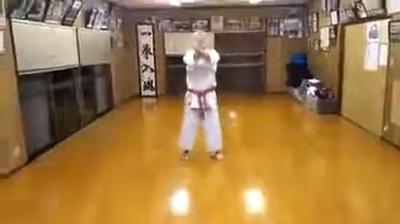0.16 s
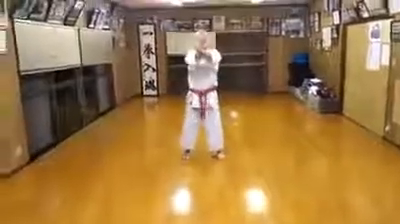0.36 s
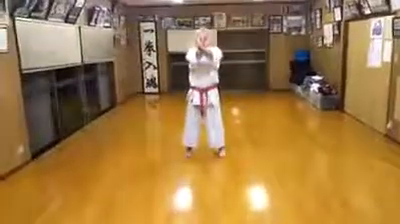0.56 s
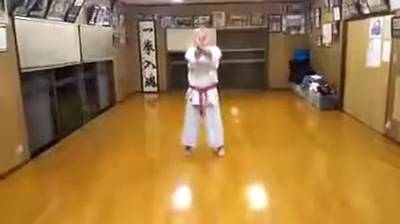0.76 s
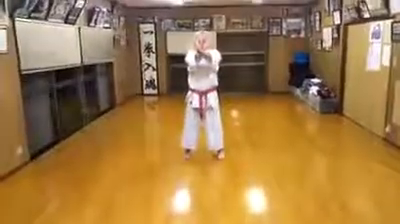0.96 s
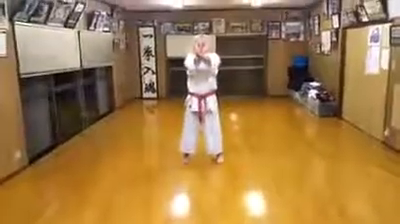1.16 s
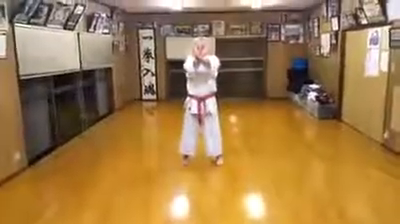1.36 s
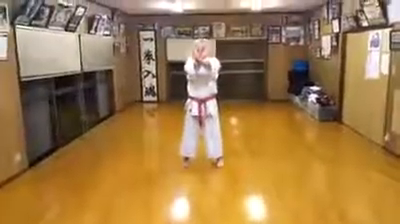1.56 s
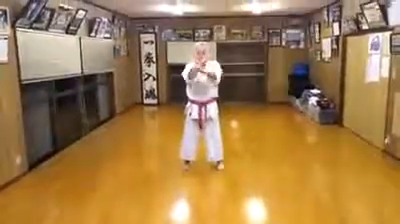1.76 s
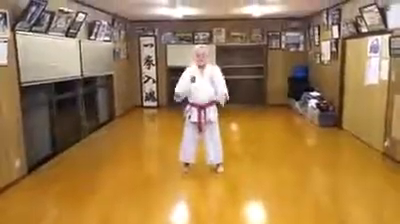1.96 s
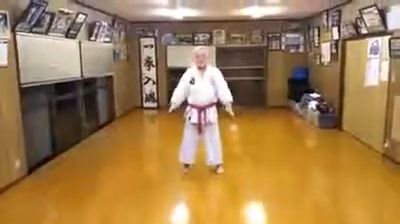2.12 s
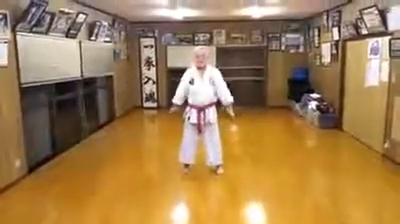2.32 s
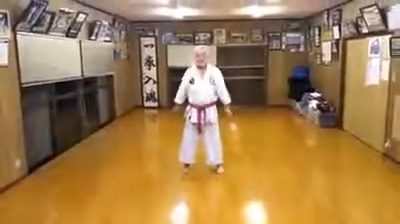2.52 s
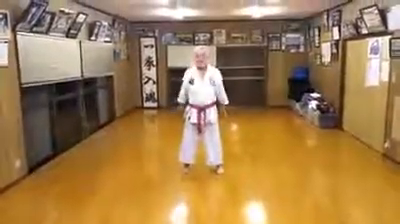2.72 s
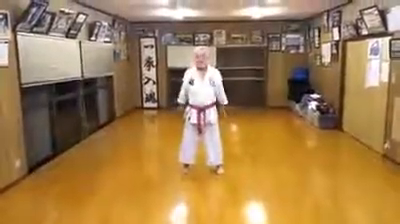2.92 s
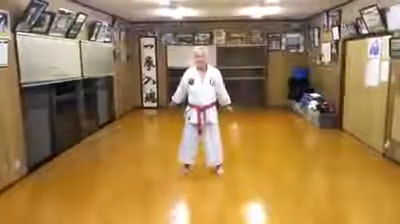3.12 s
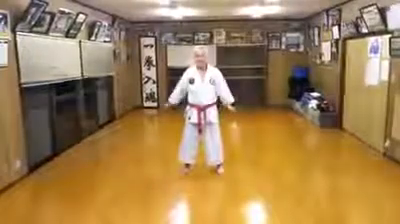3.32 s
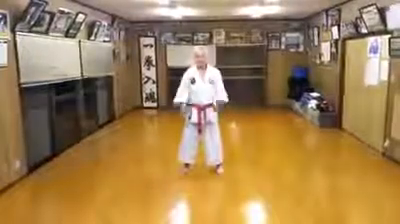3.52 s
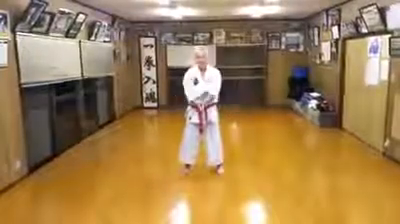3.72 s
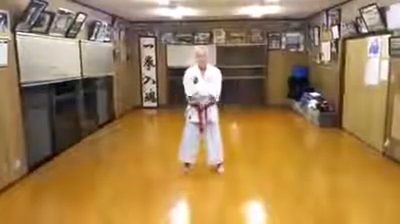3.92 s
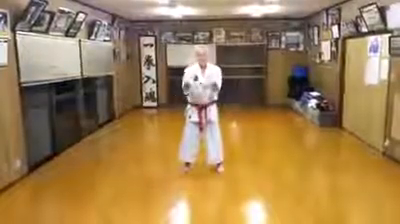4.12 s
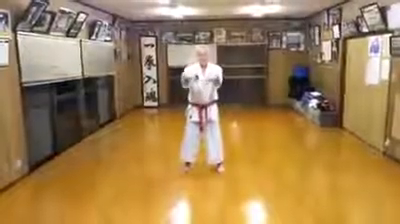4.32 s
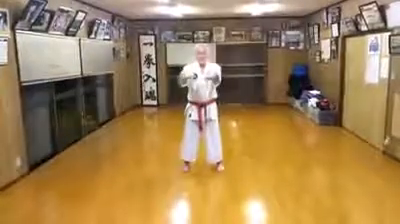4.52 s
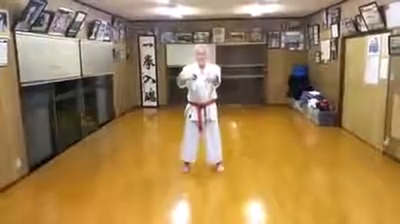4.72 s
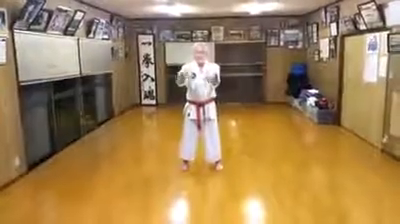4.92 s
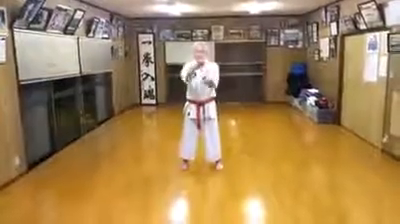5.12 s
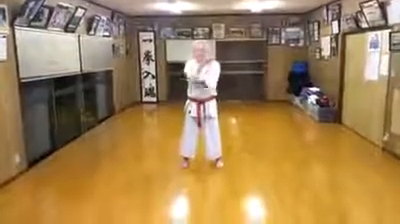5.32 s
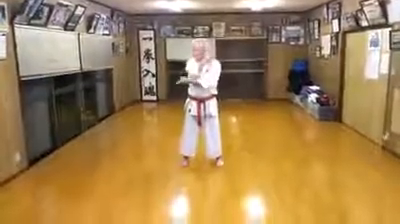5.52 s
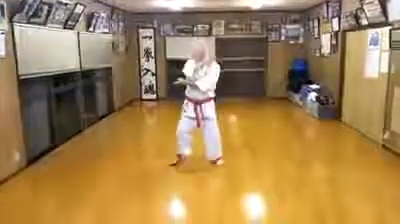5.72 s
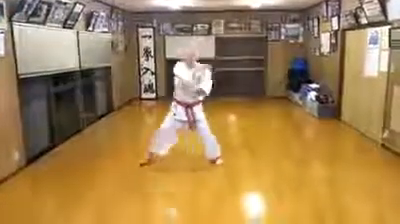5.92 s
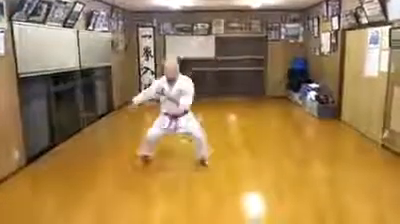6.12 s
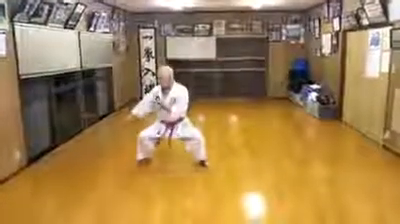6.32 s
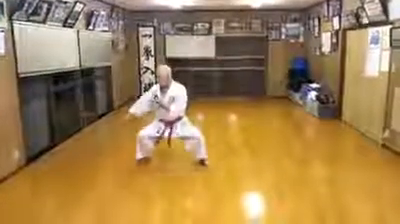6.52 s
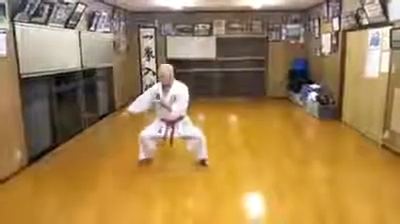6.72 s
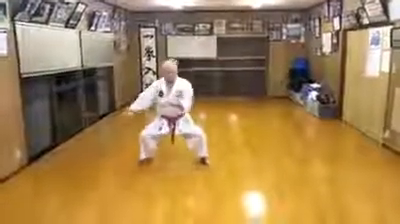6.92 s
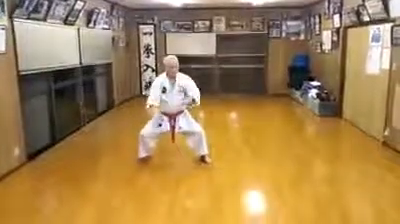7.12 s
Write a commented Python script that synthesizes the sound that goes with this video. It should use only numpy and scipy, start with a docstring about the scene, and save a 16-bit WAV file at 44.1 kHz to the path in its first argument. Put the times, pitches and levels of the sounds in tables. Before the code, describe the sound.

Steady room hum and hiss, one sharp canvas snap ringing off the walls, then a quick cloth rustle and a heavy barefoot landing on hollow boards.

```python
"""A quiet wooden training hall, heard by the two microphone ports of a distant camera. The air hums in the
hall's low modes under hiss and a faint wavering whine. Stiff sleeves crack together as one sharp blow with an
echo; cloth swishes as uneven bursts of noise; then feet land, knocking the boards and setting the sprung floor
booming in decaying sine modes. A limiter turns loud peaks down, then lets the level return."""
import sys
import numpy as np
from scipy import signal
from scipy.fft import rfft, irfft, next_fast_len
from scipy.io import wavfile
from scipy.ndimage import map_coordinates

SR = 44100
rng = np.random.default_rng(int(sys.argv[2]) if len(sys.argv) > 2 else 0)


def wav_record(signal):
    """Record a signal, one row per channel, as 16-bit PCM in the file named by sys.argv[1]."""
    frames = np.transpose(np.atleast_2d(signal))
    bounded = np.clip(frames, -1, 1)
    # unit amplitude maps onto the largest positive 16-bit level
    quanta = np.round(bounded * 32767).astype(np.int16)
    wavfile.write(sys.argv[1], SR, quanta)


def boost_factor(decibels):
    """Convert a level in decibels to a linear amplitude factor."""
    exponent = np.asarray(decibels, float) / 20
    return 10 ** exponent


N = 316197
TIME = np.arange(N) / SR  # s


def unit(x):
    """Scaled to rms 1."""
    return x / np.sqrt(np.mean(x ** 2) + 1e-20)


def along(points, hz):
    """Reads (Hz, value) points at any frequency, on a log axis."""
    f, v = np.transpose(points)
    return np.interp(np.log(hz + 1), np.log(f + 1), v)


def wobble(rate):
    """A smooth random curve with rate knots a second."""
    knots = rng.standard_normal(int(N * rate / SR) + 4)
    return map_coordinates(knots, [np.arange(N) * rate / SR])


def filtered(x, response):
    """x with its spectrum multiplied by a response of frequency."""
    m = next_fast_len(x.shape[-1] + SR // 4)
    spectrum = rfft(x, m) * response(np.fft.rfftfreq(m, 1 / SR))
    return irfft(spectrum, m)[..., :x.shape[-1]]


def coloured(x, colour):
    """x through a (Hz, dB) colour, scaled to keep the power of white noise."""
    def response(hz):
        gain = boost_factor(along(colour, hz))
        return gain / np.sqrt(np.mean(gain ** 2))
    return filtered(x, response)


def resonant(modes, sharpness):
    """Response of resonances whose powers add; the summed gain is raised to the power sharpness."""
    def response(f):
        power = sum((boost_factor(db) * f * width) ** 2 / ((hz * hz - f * f) ** 2 + (f * width) ** 2)
                    for hz, width, db in modes)
        return np.sqrt(power) ** sharpness
    return response


# How alike the two ports hear sound from all sides.
# Each row: frequency in Hz, left-right likeness from 0 to 1.
LIKENESS = [(100, 0.94), (250, 0.94), (500, 0.71), (1000, 0.14), (2000, 0.15), (5000, 0.084)]


def diffuse(pair):
    """Two unrelated signals as sound from all sides: alike at the ports in the bass, nearly unrelated above."""
    def mid_side(hz):
        angle = np.arccos(np.clip(along(LIKENESS, hz), -1, 1)) / 2
        return np.array([np.cos(angle), np.sin(angle)])
    mid, side = filtered(pair, mid_side)
    return np.array([mid + side, mid - side])


# How long the hall's echo lasts. Each row: frequency in Hz, time to fall 60 dB in seconds.
ECHO_DECAY = [(150, 0.66), (500, 0.94), (1400, 0.88), (3700, 0.92), (7000, 0.79), (9500, 0.59),
              (13000, 0.42)]


def hall(x, direct_db, build_s):
    """Direct sound, then a diffuse echo that builds up and dies at each frequency's own speed."""
    hz, t, noise = signal.stft(rng.standard_normal((2, 3 * SR // 2)), SR, nperseg=256)
    decay = boost_factor(-60 * t / along(ECHO_DECAY, hz)[:, None])
    tail = diffuse(signal.istft(noise * decay, SR, nperseg=256)[1])
    tail = tail * (1 - np.exp(-np.arange(tail.shape[1]) / SR / build_s))
    tail = tail / np.linalg.norm(tail[0])
    wet = signal.fftconvolve(x[None], tail, axes=1)[:, :N]
    return boost_factor(direct_db) * x + wet


# Low modes of the hall, before the sharpening in hum().
# Each row: frequency in Hz, width in Hz, level in dB.
HALL_MODES = [(70, 22, -5), (95, 30, -8), (120, 9, -4), (146, 17, -.6), (172, 34, -5), (216, 19, 0),
              (256, 16, -1.4), (278, 12, -2.6), (296, 12, -3.5), (352, 32, -7), (410, 60, -11),
              (485, 50, -9.5), (575, 45, -11), (705, 45, -12)]


def hum(swell_db):
    """Distant rumble rings the hall's low modes and swells with the hiss, a little less widely."""
    over_hiss_db, swing = 7.5, 0.86
    mean_db = swell_db.mean()
    level_db = mean_db + over_hiss_db + swing * (swell_db - mean_db)
    rumble = diffuse(rng.standard_normal((2, N)))
    return boost_factor(level_db + 1.55 * wobble(5)) * unit(filtered(rumble, resonant(HALL_MODES, 1.6)))


# Colour of the hiss. Each row: frequency in Hz, relative density in dB per Hz.
HISS_COLOUR = [(250, -30), (400, -4), (700, 7), (1000, 7), (1300, 4), (1700, 1.5), (2300, 3.5), (2800, 3),
               (4000, 1), (6200, -3.5), (9000, -2), (15000, -5)]


def hiss(swell_db):
    """Diffuse coloured noise that swells slowly with a slight waver."""
    noise = unit(coloured(diffuse(rng.standard_normal((2, N))), HISS_COLOUR))
    return boost_factor(swell_db + .4 * wobble(4)) * noise


# Overtones of one faint tone, widths taken before the sharpening in whine().
# Each row: frequency in Hz, width in Hz, level in dB before the shared waver.
WHINE_OVERTONES = [(2333, 130, -54), (3476, 210, -54.5), (4680, 200, -55)]


def whine():
    """Narrow bands of noise around the overtones waver together, slowly and fast."""
    tone = sum(boost_factor(db) * unit(filtered(rng.standard_normal((2, N)), resonant([(hz, width, 0)], 1.15)))
               for hz, width, db in WHINE_OVERTONES)
    return boost_factor(1.9 * wobble(3.06)) * boost_factor(1.2 * wobble(22)) * tone


# Swell of the distant noise that reaches the hall.
# Each row: time in seconds, hiss level in dB before its small waver.
AIR_SWELL = [(0, -42.5), (.75, -43), (1.2, -45), (2.1, -41), (2.6, -43.5), (3.6, -42.5), (4.9, -42),
             (5.3, -45), (5.7, -42), (7.17, -43)]


def air():
    """The hall's hum and hiss follow one swell; the whine lies over them."""
    swell_db = np.interp(TIME, *np.transpose(AIR_SWELL))
    return hum(swell_db) + hiss(swell_db) + whine()


# Swishes of cloth rubbing and flapping.
# Each row: start in seconds, rise in seconds, hold in seconds, level in dB.
SWISHES = [(5.722, 0.004, 0.018, -25), (6.067, 0.044, 0.084, -31), (6.217, 0.028, 0.017, -29),
           (6.425, 0.014, .01, -38.5), (6.57, .015, .01, -42)]
# Colour of the cloth. Each row: frequency in Hz, relative density in dB per Hz.
CLOTH_COLOUR = [(300, -7), (700, -3), (1300, -10), (2300, 1), (4000, -2.5), (6200, -0.5), (9000, -1),
                (15000, -7.5)]


def cloth():
    """Folds of canvas slip in quick uneven spurts of noise; each swish rises, holds and fades."""
    fade_db_per_s = 600
    spurts = unit(boost_factor(2.3 * wobble(90)) * rng.standard_normal(N))
    swishes = np.zeros(N)
    for start_s, rise_s, hold_s, db in SWISHES:
        rise = np.clip((TIME - start_s) / rise_s, 0, 1)
        fading_s = np.maximum(TIME - start_s - rise_s - hold_s, 0)
        swishes += rise * boost_factor(db - fade_db_per_s * fading_s)
    return hall(swishes * coloured(spurts, CLOTH_COLOUR), direct_db=-8, build_s=.004)


# Contacts of toes, balls and heels with the floor.
# Each row: time in seconds, push on the floor's modes in dB, knock on the boards in dB.
CONTACTS = [(5.742, -47, -24), (6.100, -18.5, -19.5), (6.133, -23, -20), (6.165, -50, -17.5),
            (6.19, -14, -15), (6.232, -6.5, -5.5), (6.250, -1.5, -8), (6.272, -40, -17.5),
            (6.296, -3.5, -29), (6.338, -10.5, -35)]
# Modes of the sprung floor. Each row: frequency in Hz, level in dB, time to fall 60 dB in seconds,
# sense (1 or -1) in which the mode moves under the feet.
FLOOR_MODES = [(68, 0, 0.24, -1), (73.4, -3.5, 3.5, 1), (77.85, -11, 3.6, 1), (81.9, -5.5, 1.16, -1),
               (93.2, -6.5, 0.32, 1), (146.4, -18.5, 0.55, 1)]
# When the boom starts to die away faster: time in seconds, extra decay in dB per second.
BOOM_SETTLES = (6.625, 116)
# Colour of the knocks. Each row: frequency in Hz, relative density in dB per Hz.
KNOCK_COLOUR = [(70, -20), (130, 5), (350, -6.5), (600, -6.5), (900, -10.5), (1300, -13), (2300, -19),
                (3200, -21.5), (5000, -27.5), (8000, -47.5)]


def boom():
    """Each push sets the floor's modes ringing as decaying sines that add up."""
    pushes = np.zeros(N)
    for s, push_db, _ in CONTACTS:
        pushes[round(s * SR)] = boost_factor(push_db)
    t = np.arange(2 * SR) / SR
    ring = sum(np.sign(sense) * boost_factor(db - 60 * t / t60) * np.sin(2 * np.pi * hz * t)
               for hz, db, t60, sense in FLOOR_MODES)
    ring = ring * (1 - np.exp(-t / 0.0038))  # a sole lands softly
    settle_s, extra_db_per_s = BOOM_SETTLES
    settling = boost_factor(-extra_db_per_s * np.maximum(TIME - settle_s, 0))
    near = signal.fftconvolve(pushes, ring)[:N] * settling
    return np.array([near, np.roll(near, shift=12)])  # the far port hears it 12 samples later


def knocks():
    """Each contact knocks the boards under the sole: a short burst of noise, echoed by the hall."""
    bursts = np.zeros(N)
    t = np.arange(2 * SR) / SR
    for s, _, knock_db in CONTACTS:
        start = round(s * SR)
        envelope = boost_factor(knock_db - 60 * t / 0.065) * (1 - np.exp(-t / 0.0021))
        burst = envelope * rng.standard_normal(len(t))
        bursts[start:start + len(t)] += burst[:N - start]
    return hall(coloured(bursts, KNOCK_COLOUR), direct_db=-8, build_s=.003)


def feet():
    """Landing feet push the floor into its boom and knock its boards."""
    return boom() + knocks()


# The sleeves meet: time in seconds, level of the blow in dB.
SLEEVES_MEET = (3.730, 43.2)
# Colour of the crack. Each row: frequency in Hz, relative density in dB per Hz.
CRACK_COLOUR = [(70, -20), (170, -9), (400, -5), (700, -4.5), (1000, -4), (1300, -1.5), (1900, 4.5),
                (2300, 5), (3400, 2), (4000, 1), (5300, -2), (6200, 0), (8400, 1.5), (12000, -5.5),
                (15000, -13)]
# Ring of the air pocket and the taut canvas.
# Each row: frequency in Hz, level in dB, time to fall 60 dB in seconds.
SLEEVE_MODES = [(420, -6, .09), (1900, 0, .07), (6300, -11, .08)]


def crack():
    """Stiff sleeves strike in one sharp blow: a brief direct ring of unsteady sines, and the hall's echo."""
    s, db = SLEEVES_MEET
    blow = np.zeros(N)
    blow[round(s * SR)] = boost_factor(db)
    t = np.arange(SR // 4) / SR
    ring = np.zeros(len(t))
    for hz, level_db, t60 in SLEEVE_MODES:
        envelope = boost_factor(level_db - 60 * t / t60 + 3.7 * wobble(200)[:len(t)])
        ring += envelope * np.sin(2 * np.pi * hz * t)
    ring = ring * (1 - np.exp(-t / .002))  # the layers of canvas meet over a moment
    direct = boost_factor(-38) * signal.fftconvolve(blow, ring)[:N]
    return direct + hall(coloured(blow, CRACK_COLOUR), direct_db=-50, build_s=.001)


def scene():
    """Everything in the hall, before the colour of the two ports."""
    return air() + cloth() + feet() + crack()


# Colour of the two microphone ports. Each row: frequency in Hz, left gain in dB, right gain in dB.
PORT_COLOUR = [(30, -9, 2), (54.7, -1, -2), (4100, 0.5, 1), (5420, 2.5, 1), (6290, 6.5, 1.5), (7040, 0, -2),
               (7760, -2, -10.5), (8470, -12, -6.5), (8960, -20, -8), (9800, -28, -8.5), (10410, -38, -4),
               (11230, -23, 2.5), (12500, -11, 3), (13200, -27, -3), (14300, -29, -4)]


def ports(x):
    """Each microphone port filters the sound with its own frequency response."""
    f, *port_db = np.transpose(PORT_COLOUR)
    return filtered(x, lambda hz: boost_factor([along(np.transpose([f, db]), hz) for db in port_db]))


def limiter(x, ceiling_db, release_s, share, creep_db, attack_s):
    """Gain drops on peaks over the ceiling and springs back; a share creeps back at creep_db a second."""
    over_db = np.maximum(20 * np.log10(np.abs(x).max(0) + 1e-9) - ceiling_db, 1e-6)
    # running maxima hold each peak while it decays: exponentially in dB, or along a straight line in dB
    quick_db = np.exp(np.maximum.accumulate(np.log(over_db) + TIME / release_s) - TIME / release_s)
    slow_db = np.maximum.accumulate(share * over_db + creep_db * TIME) - creep_db * TIME
    step = 1 - np.exp(-1 / (attack_s * SR))  # the gain follows a little late, so first peaks can overshoot
    drop_db = signal.lfilter([step], [1, step - 1], np.maximum(quick_db, slow_db))
    return x * boost_factor(-drop_db)


def band_limit(x):
    """A steep low-pass at the top of the band."""
    return signal.sosfilt(signal.butter(12, 15040, fs=SR, output="sos"), x)


def record(dry):
    """The ports colour the sound; a limiter, full-scale clipping and a band limit in Hz follow."""
    held = limiter(ports(dry), ceiling_db=0.6, release_s=0.066, share=0.54, creep_db=22.5, attack_s=0.0002)
    clipped = np.clip(held, -1, 1)
    mix = filtered(clipped, lambda hz: hz < 15040)
    return band_limit(mix)


dry = scene()
out = record(dry)
wav_record(out)
```